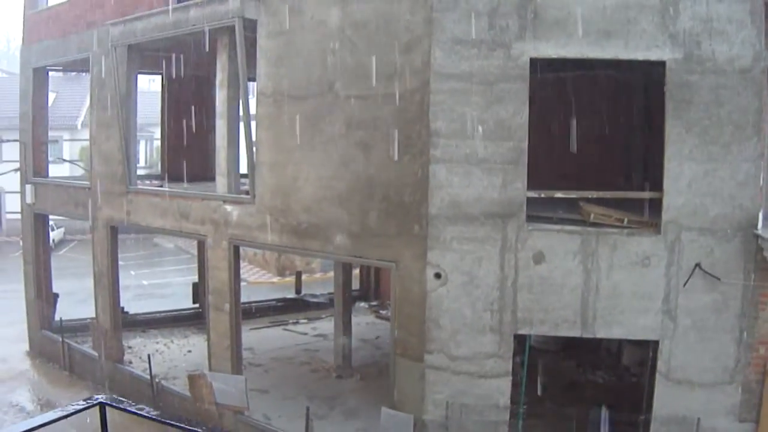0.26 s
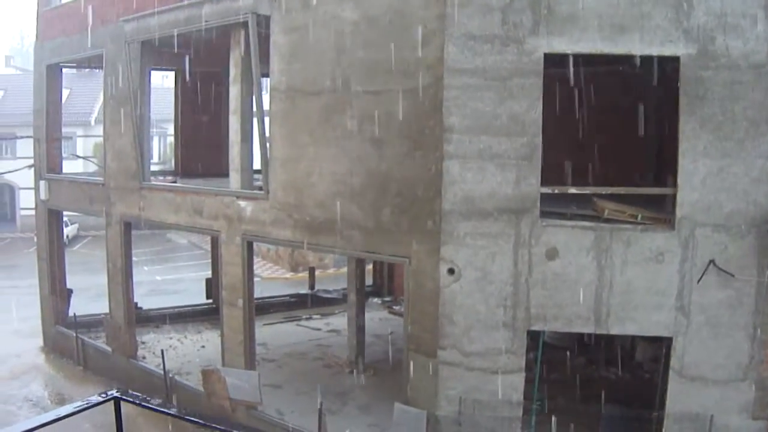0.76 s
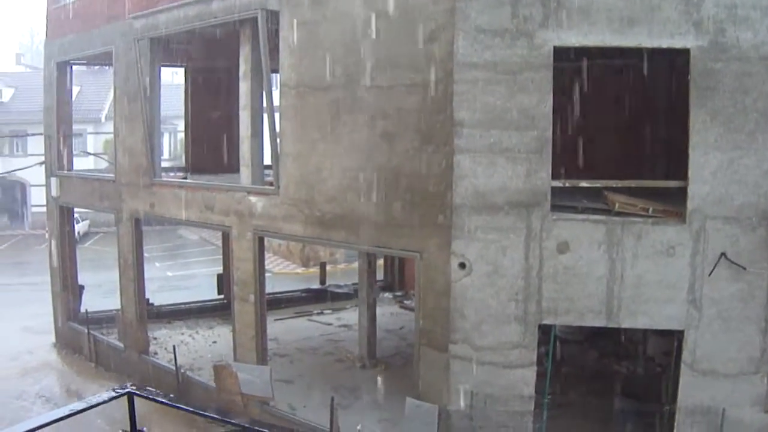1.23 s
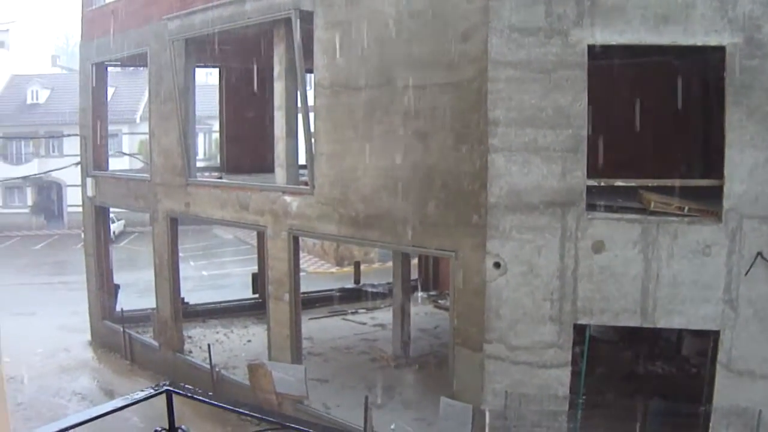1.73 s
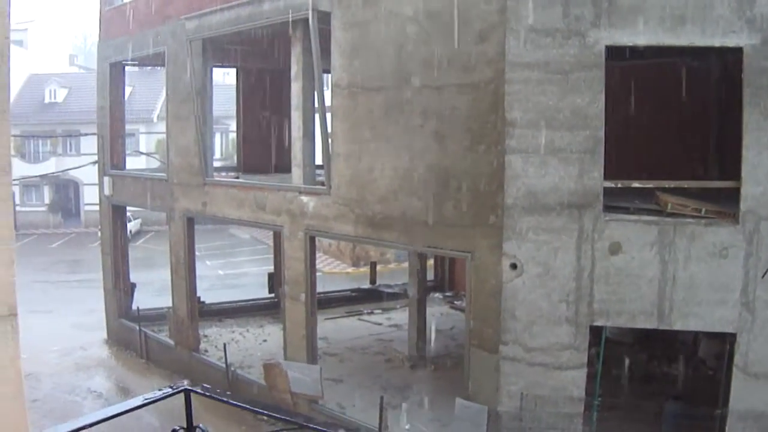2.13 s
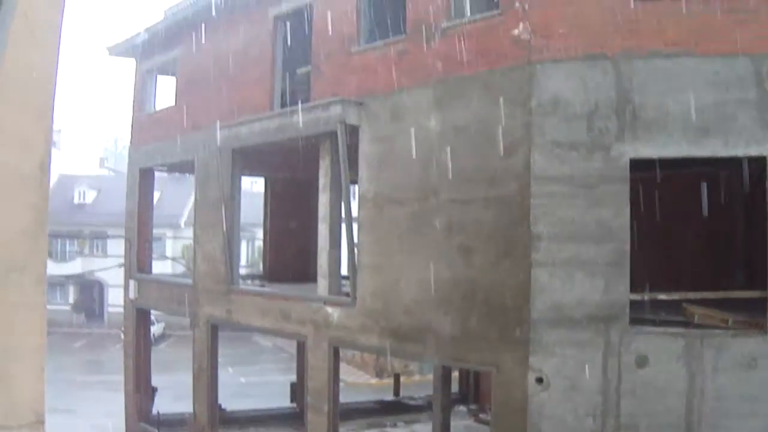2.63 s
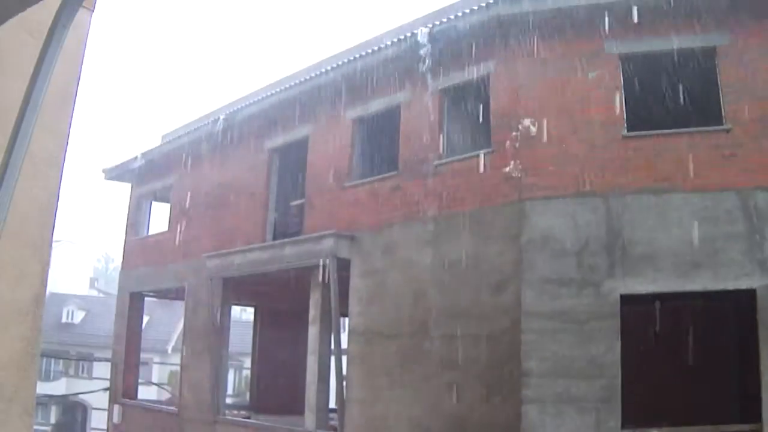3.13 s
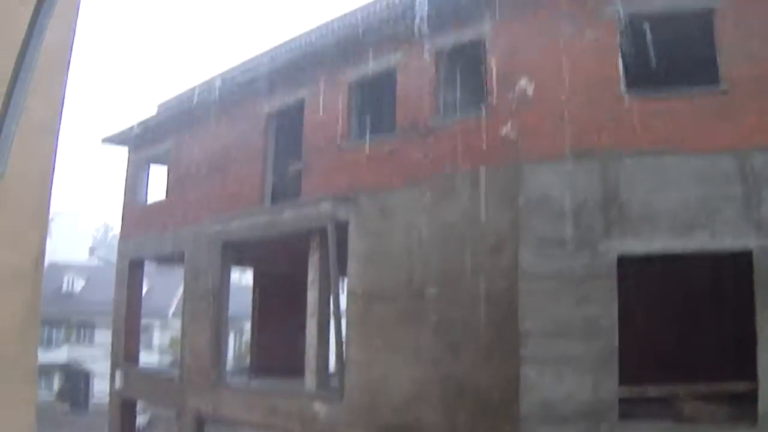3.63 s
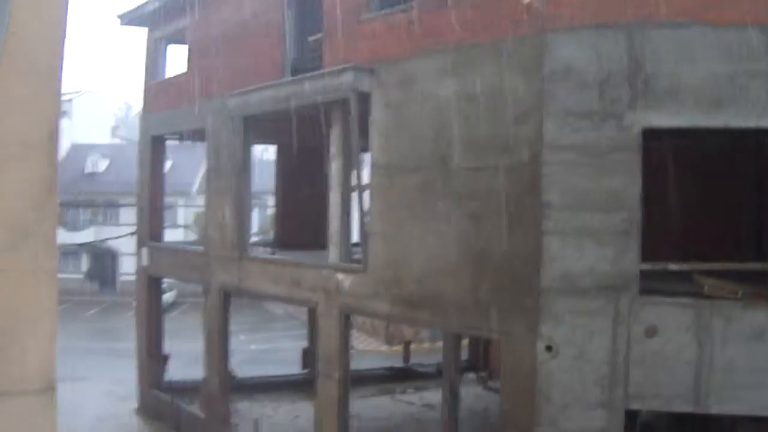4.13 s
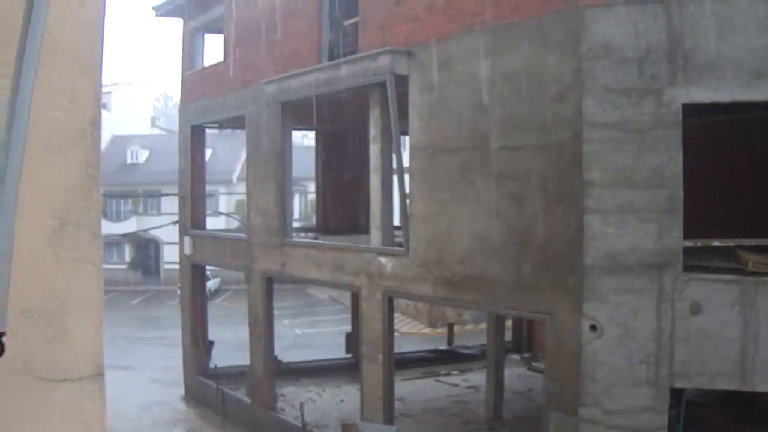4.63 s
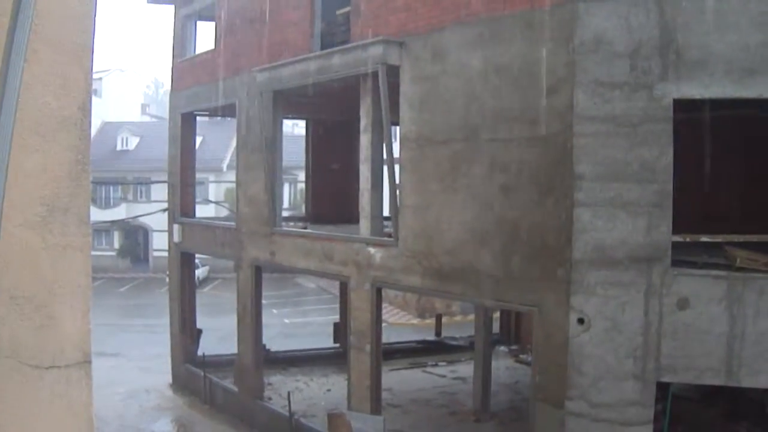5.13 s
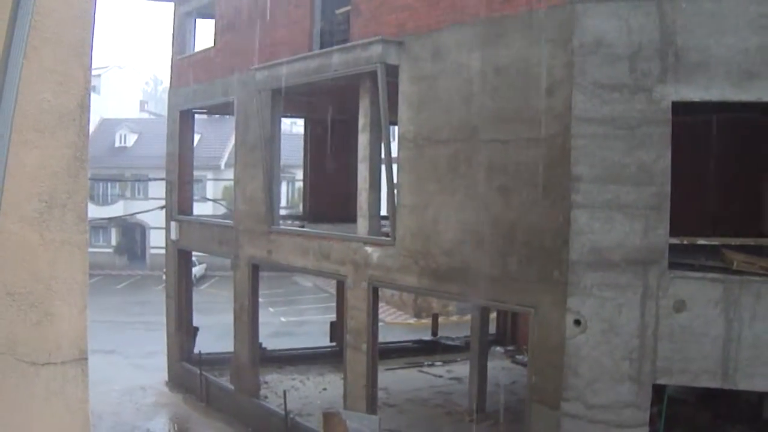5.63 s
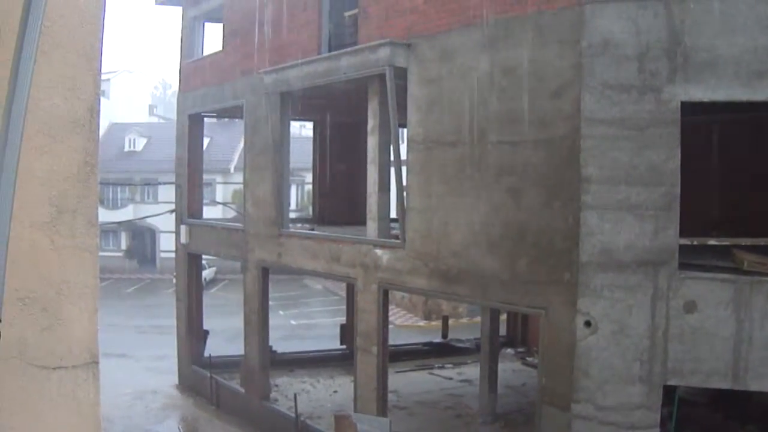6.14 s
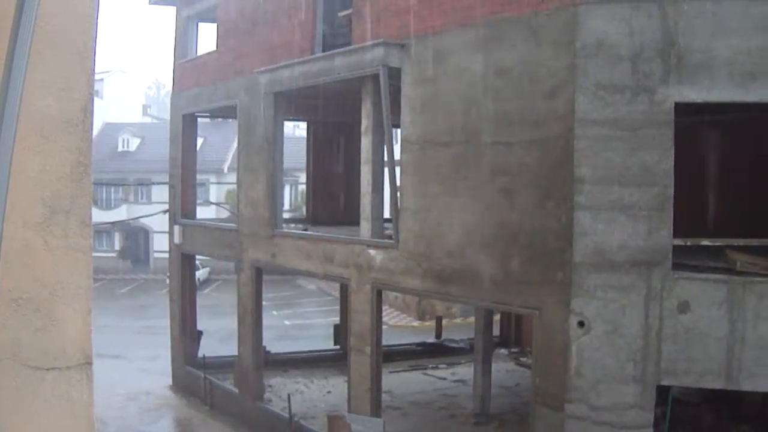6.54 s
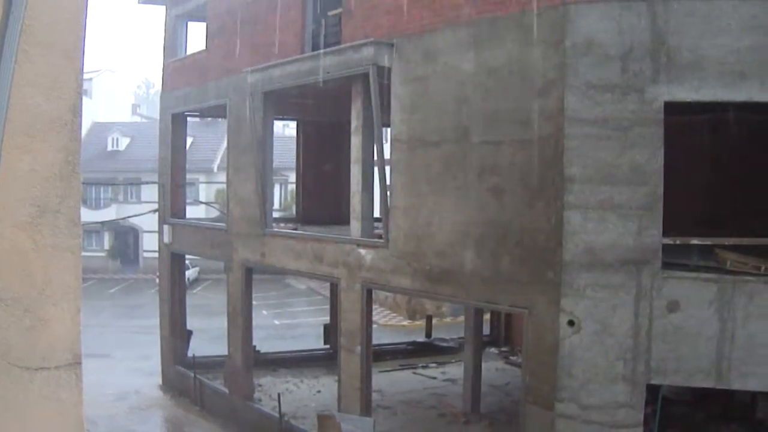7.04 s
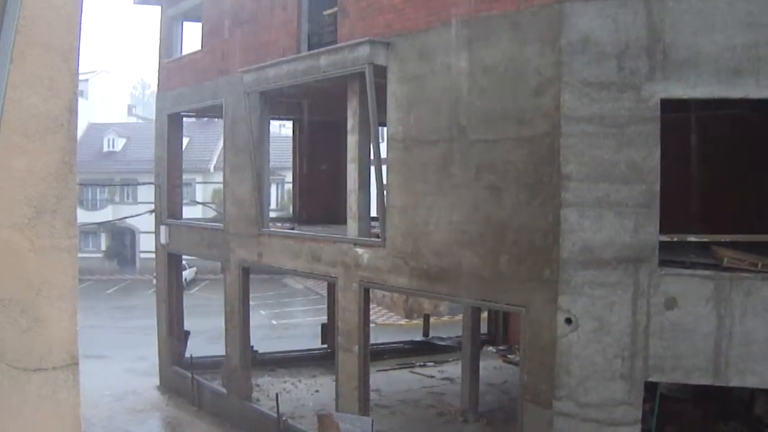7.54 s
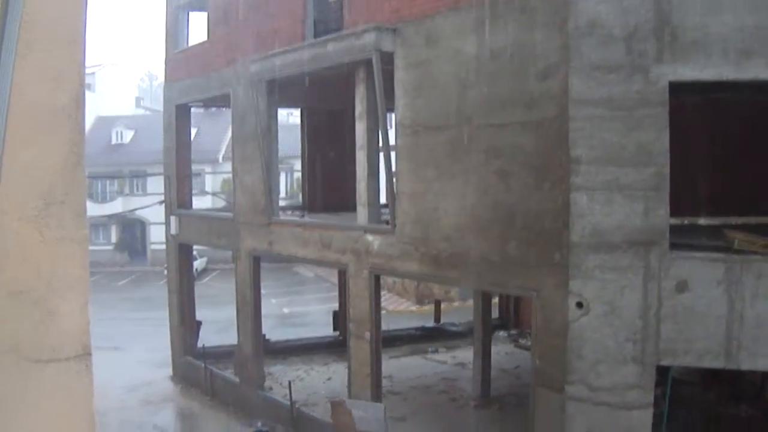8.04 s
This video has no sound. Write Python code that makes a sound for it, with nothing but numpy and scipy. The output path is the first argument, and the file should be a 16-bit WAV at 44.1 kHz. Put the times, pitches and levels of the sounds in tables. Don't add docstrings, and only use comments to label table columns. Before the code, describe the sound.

A downpour hisses and drums outdoors while fat drops snap nearby, bubbles plink in puddles, and wind buffets the microphone with low bumps.

```python
import sys
import numpy as np
from scipy import signal
from scipy.fft import rfft, irfft
from scipy.io import wavfile

SR = 44100
rng = np.random.default_rng(int(sys.argv[2]) if len(sys.argv) > 2 else 0)


def wav_record(signal):
    frames = np.transpose(np.atleast_2d(signal))
    bounded = np.clip(frames, -1, 1)
    quanta = np.round(bounded * 32767).astype(np.int16)
    wavfile.write(sys.argv[1], SR, quanta)


def elevation(decibels):
    levels = np.asarray(decibels, float)
    return 10 ** (levels / 20)


N = 365148

# t/s, roar level/dB, treble re roar/dB
DOWNPOUR = [(0.0, -24.5, -3.5), (0.32, -25, -3.5), (0.5, -24, -3), (0.8, -24, -4.5), (1.35, -23, -4),
            (1.7, -24, -4), (2.3, -23.5, -4.5), (2.6, -24.5, -4), (3.04, -23.5, -5), (3.74, -22.5, -6.5),
            (3.93, -23.5, -5), (4.05, -23, -3.5), (5.5, -22.5, -4.5), (6.4, -23.5, -4.5), (6.7, -23, -4.5),
            (7.8, -23.5, -4), (8.08, -23.5, -3.5), (8.28, -22.5, -4)]
# f/Hz, level/dB per Hz
ROAR_SPECTRUM = [(260, -44), (450, -8.5), (535, -10.5), (571, -5.5), (725, -0.5), (959, -3), (1110, -1.5),
                 (1370, -4.5), (1590, -4), (1940, -6), (2240, -6), (4410, -8.5), (10700, -17.5),
                 (13900, -6), (22000, -120)]
# f/Hz, level/dB per Hz
RUMBLE_SPECTRUM = [(15, -83), (25, -53), (75, -48), (95, -19), (176, -9), (208, -2.5), (342, -5),
                   (374, -1.5), (426, -13), (473, -4), (560, -6), (730, -25), (1230, -120)]
# t/s, level/dB (each peaks 2.5 dB below it), centre f/Hz
PUDDLE_SPLATS = [(0.1022, -17, 2500), (0.464, -16, 1260), (0.6474, -13, 2520), (1.0534, -19, 1160),
                 (1.3745, -12, 1810), (1.382, -11, 3040), (1.393, -21, 1580), (2.044, -14, 1600),
                 (2.6209, -13, 1480), (2.877, -19, 1250), (3.674, -15, 1160), (4.125, -12, 2650),
                 (4.304, -15, 1350), (4.585, -16, 1450), (4.7564, -14.5, 1100), (4.958, -14, 1450),
                 (5.09, -15, 1570), (5.339, -16, 1250), (5.98, -34, 1160), (8.05, -13, 2250),
                 (8.074, -21, 1100)]
# peak t/s, peak level/dB, fall/dB per s
AIR_PUFFS = [(0.5, -51, 34), (0.92, -42, 150), (1.18, -55, 140), (1.4, -59, 90), (1.61, -59, 90),
             (1.84, -46, 116), (2.07, -42, 38), (2.24, -45, 72), (2.58, -52, 90), (2.7, -39, 170),
             (3.02, -48.5, 30), (3.22, -41, 278), (3.46, -45, 122), (3.87, -57, 197), (4.22, -57, 152),
             (4.43, -56, 60), (4.73, -56, 220), (5.26, -53, 60), (5.56, -65, 250), (6.18, -61, 18),
             (6.59, -55, 258), (6.76, -57, 250), (7.15, -60, 150), (7.89, -61, 36)]
# t/s, peak level/dB, centre f/Hz, burst decay/s
LEDGE_DROPS = [(0.47, -16, 4400, .004), (0.772, -12, 6370, .003), (1.425, -14, 8000, .001),
               (1.4530, -6, 5300, .0006), (1.455, -11, 6200, .003), (1.7165, -13, 3500, .002),
               (1.804, -15, 5500, .002), (2.092, -13, 4900, .001), (2.182, -15, 4000, .0018),
               (2.63, -13, 8000, .0006), (2.6326, -7, 6300, .001), (2.6348, -8, 5200, .003),
               (3.0547, -9, 3900, 0.00085), (3.0570, -11, 4300, .001), (3.278, -16, 3500, .001),
               (3.2808, -4.5, 7400, 0.00058), (3.2845, -10, 8800, .001), (3.659, -17, 4600, .002),
               (4.2931, -11, 3900, .002), (5.042, -13, 8000, .002), (5.5852, -16, 7500, .002),
               (7.0900, -12, 5000, .001), (7.0928, -9, 8500, .001), (7.1815, -10.5, 5500, .0065),
               (7.5717, -9, 5570, 0.0027), (8.1192, -9, 4770, .0015), (8.1225, -17, 8000, .001),
               (8.169, -10.5, 4000, .002), (8.171, -7, 5300, .0006)]
# t/s, f/Hz, level/dB
PORT_WHISTLES = [
    [(1.62, 1757, -46), (1.8, 1580, -29.5), (2.04, 1590, -39), (2.2, 1692, -29), (2.33, 1840, -23.5),
     (2.47, 1835, -28), (2.58, 1790, -32), (2.65, 1760, -52)],
    [(6.94, 1665, -41), (7.02, 1655, -30), (7.09, 1690, -33), (7.15, 1670, -45)],
]
# centre t/s, peak level/dB, f/Hz
PRESSURE_LUMPS = [(2.083, -22, 145), (2.137, -26, 270), (2.162, -21, 180), (2.232, -25, 250),
                  (2.29, -28, 150), (2.35, -31, 180), (2.42, -29, 210), (2.535, -20, 240),
                  (2.598, -20, 170), (2.67, -26, 260), (2.731, -16, 300), (2.738, -17, 290),
                  (2.757, -17, 260), (2.773, -25, 170)]
# t/s, gain dip level/dB, spray treble lift level/dB
CLOSE_DROPS = [(0.775, 1, -0.5), (1.43, 2.5, 2), (1.456, 2, -2), (2.182, 2, -2), (2.634, 4.5, 5),
               (3.058, 6, 1), (3.283, 4.5, 3.5), (5.043, 2, -0.5), (7.093, 2.5, 2), (8.123, 3, 1.5),
               (8.172, 3.5, -3)]

RUMBLE_DB, SPLAT_S = -39, 0.0051
PUFF_RISE_DB_PER_S, CALM_DB, WAKE_TOP_DB = 220, -65, -23
WHISTLE_WIDTH_HZ = 240
RELEASE_S, GRAB_S, SPRAY_S = 0.073, 0.0019, 0.053
MIC_CUT_HZ, EDGE_HZ = 72, 10990
STRIP_LOW_HZ, STRIP_HIGH_HZ, STRIP_DB = 12970, 13480, -31


def rms_one(x):
    return x / np.sqrt(np.mean(x ** 2) + 1e-20)


def in_time(rows, outside=None):
    s, *columns = np.transpose(rows)
    return [np.interp(np.arange(N) / SR, s, c, outside, outside) for c in columns]


def band(x, low_hz, high_hz, order=2):
    sos = signal.butter(order, [low_hz, min(high_hz, .45 * SR)], "band", fs=SR, output="sos")
    return signal.sosfilt(sos, x)


def low_pass(x, cut_hz):
    return signal.sosfilt(signal.butter(2, cut_hz, fs=SR, output="sos"), x)


def drift(rate_hz):
    r = np.exp(-2 * np.pi * rate_hz * 40 / SR)
    slow = signal.lfilter([1], [1, -2 * r, r * r], rng.standard_normal(N // 40 + 2002))
    slow = rms_one(slow[2000:])
    return np.interp(np.arange(N) / 40, np.arange(len(slow)), slow)


def coloured(x, spectrum):
    hz, level_db = np.transpose(spectrum)
    bins_hz = np.maximum(np.fft.rfftfreq(N, 1 / SR), 1)
    gain = elevation(np.interp(np.log(bins_hz), np.log(hz), level_db, left=-120))
    return rms_one(irfft(rfft(x) * gain, N))


def ring(clicks, hz, t60_s):
    r, w = elevation(-60 / (t60_s * SR)), 2 * np.pi * hz / SR
    return signal.lfilter([0, np.sin(w)], [1, -2 * r * np.cos(w), r * r], clicks + 1e-18)


def after(times_s, sizes, decay_s):
    kicks = np.zeros(N)
    kicks[(times_s * SR).astype(int)] = np.maximum(sizes, 0)
    fast = np.exp(-1 / (GRAB_S * SR))
    decay = signal.lfilter([1], [1, -np.exp(-1 / (decay_s * SR))], kicks)
    return signal.lfilter([1 - fast], [1, -fast], decay)


def patchy_noise(bright_db, patchy_db, shared_db):
    octave = np.log2(np.maximum(np.fft.rfftfreq(N, 1 / SR), 1))
    white = rfft(rng.standard_normal((2, N)))
    together, out = drift(12.0), 0
    for k, centre in enumerate(np.arange(8, 14.6, .5)):
        slice_gain = np.cos(np.pi * np.clip(octave - centre, -.5, .5))
        treble_share = np.clip(centre / 2 - 5.5, 0, 1)
        swell_db = treble_share * bright_db + shared_db * together + patchy_db * drift(13.0)
        out = out + elevation(swell_db) * irfft(white[k % 2] * slice_gain, N)
    return out


def roar(level_db, bright_db):
    far = coloured(patchy_noise(bright_db, patchy_db=0.66, shared_db=0.42), ROAR_SPECTRUM)
    rumble = coloured(rng.standard_normal(N), RUMBLE_SPECTRUM)
    rumble_db = RUMBLE_DB + 0.82 * (level_db - level_db.mean())
    return elevation(level_db) * far + elevation(rumble_db) * rumble


def patter(level_db):
    sizes = elevation(2.45 * np.minimum(rng.exponential(1, N), 3.5)) * rng.choice([-1, 1], N)
    rate_hz = 1500 * elevation(4.0 * drift(18.0) + 3.0 * drift(60.0))
    born = rng.random(N) < rate_hz / SR
    pitches_hz, dealt = np.geomspace(1800, 10000, 14), rng.integers(0, 14, N)
    snaps = np.zeros(N)
    for k, hz in enumerate(pitches_hz):
        snaps += ring(sizes * born * (dealt == k), hz, 5.1 / hz) * (hz / 5000) ** 0.5
    return elevation(level_db - 7.5) * rms_one(band(snaps, 1260, 16400))


def plinks(level_db):
    sizes = elevation(3.0 * np.minimum(rng.exponential(1, N), 4)) * rng.choice([-1, 1], N)
    born = rng.random(N) < 350 / SR
    pitches_hz, dealt = np.geomspace(700, 8000, 30), rng.integers(0, 30, N)
    rings = np.zeros(N)
    for k, hz in enumerate(pitches_hz):
        rings += ring(sizes * born * (dealt == k), hz, 19.0 / hz)
    return elevation(level_db - 12.5) * rms_one(band(rings, 590, 9800))


def add_burst(out, s, peak_db, hz, decay_s, spread):
    t = np.arange(round(.04 * SR)) / SR
    spray = rng.standard_normal(len(t)) * np.exp(-t / max(decay_s, .0004))
    spray[0] = -3.0
    burst = band(spray, hz / spread, hz * spread)
    at = round(s * SR)
    out[at:at + len(t)] += (elevation(peak_db) * burst / np.abs(burst).max())[:N - at]


def splats():
    out = np.zeros(N)
    for s, peak_db, hz in PUDDLE_SPLATS:
        add_burst(out, s, peak_db - 2.5, hz, SPLAT_S, spread=1.2)
    return out


def buffet():
    t, level_db = np.arange(N) / SR, CALM_DB
    for s, peak_db, fall in AIR_PUFFS:
        puff_db = peak_db - np.maximum(PUFF_RISE_DB_PER_S * (s - t), fall * (t - s))
        level_db = np.maximum(level_db, puff_db)
    return elevation(level_db + 2.4 * drift(5.5)) * rms_one(band(rng.standard_normal(N), 43, 160))


def drops():
    out = np.zeros(N)
    for s, peak_db, hz, decay_s in LEDGE_DROPS:
        add_burst(out, s, peak_db, hz, decay_s, spread=1.35)
    return out


def whistle():
    out = np.zeros(N)
    for rows in PORT_WHISTLES:
        hz, level_db = in_time(rows)[0], in_time(rows, outside=-99)[1]
        wobble = low_pass(rng.standard_normal((2, N)), WHISTLE_WIDTH_HZ / 2)
        phase = 2 * np.pi * np.cumsum(hz) / SR
        out += elevation(level_db) * rms_one(wobble[0] * np.cos(phase) + wobble[1] * np.sin(phase))
    return out


def lumps():
    out, turbulence = np.zeros(N), rms_one(band(rng.standard_normal(N), 96, 330))
    wake = np.hanning(round(0.034 * SR))
    for s, peak_db, hz in PRESSURE_LUMPS:
        at, t = round((s - 1 / hz) * SR), np.arange(round(2 / hz * SR)) / SR
        lump = np.hanning(len(t)) * np.cos(2 * np.pi * hz * t - np.pi / 6)
        out[at:at + len(t)] -= elevation(peak_db) * lump
        eddies = wake * turbulence[at:at + len(wake)]
        out[at:at + len(wake)] += elevation(min(peak_db, WAKE_TOP_DB) - 10) * eddies
    return out


def scene():
    roar_db, treble_db = in_time(DOWNPOUR)
    s, _, lift_db = np.transpose(CLOSE_DROPS)
    bright_db = treble_db - treble_db.mean() + after(s, lift_db, SPRAY_S)
    rain = roar(roar_db + 1.66, bright_db) + patter(roar_db + bright_db) + plinks(roar_db)
    gust = buffet() + whistle() + lumps()
    return (rain + splats() + drops() + gust)[None]


def gain_control():
    s, dip_db, _ = np.transpose(CLOSE_DROPS)
    return elevation(-after(s, dip_db, RELEASE_S))


def top_cut(x):
    return signal.sosfilt(signal.butter(12, 13560, fs=SR, output="sos"), x)


def record(dry):
    bass_cut = signal.butter(2, MIC_CUT_HZ, "high", fs=SR, output="sos")
    spectrum = rfft(signal.sosfilt(bass_cut, dry) * gain_control())
    hz = np.fft.rfftfreq(N, 1 / SR)
    edge = np.clip((EDGE_HZ - hz) / 220 + .5, 0, 1) ** 2
    in_strip = (hz > STRIP_LOW_HZ) * (hz < STRIP_HIGH_HZ)
    strip = elevation(STRIP_DB - 14.0 * (hz - STRIP_LOW_HZ) / 640) * in_strip
    mix = irfft(spectrum * edge, N) + elevation(2.5 * drift(15.0)) * irfft(spectrum * strip, N)
    return top_cut(mix)


dry = scene()
out = record(dry)
wav_record(out)
```